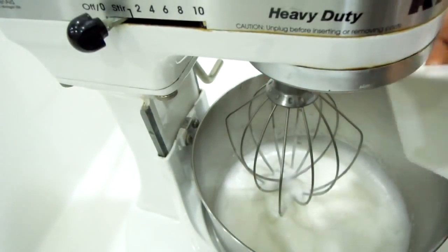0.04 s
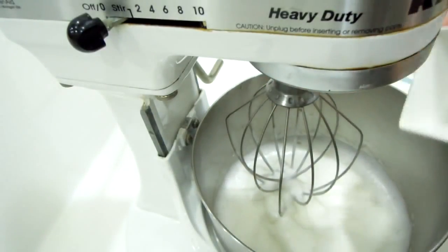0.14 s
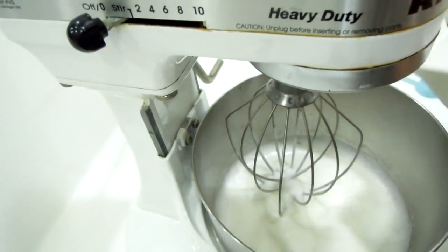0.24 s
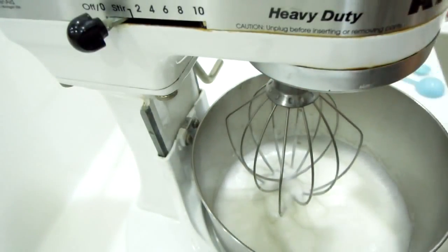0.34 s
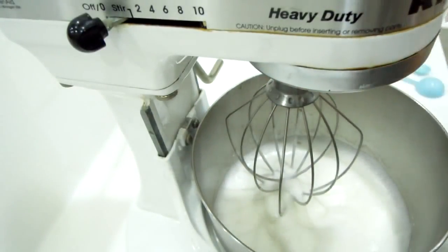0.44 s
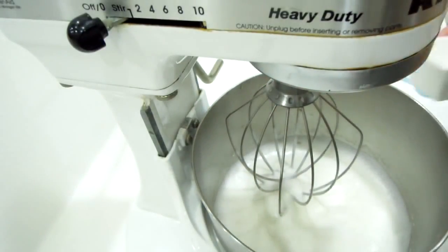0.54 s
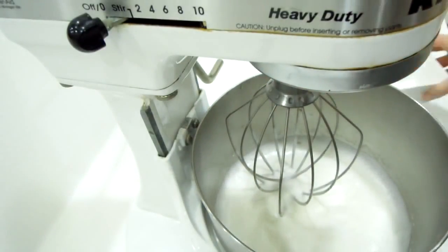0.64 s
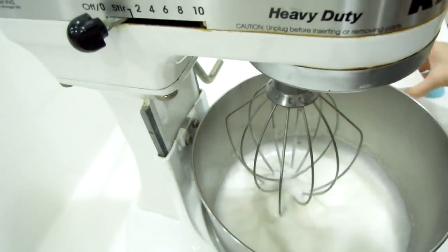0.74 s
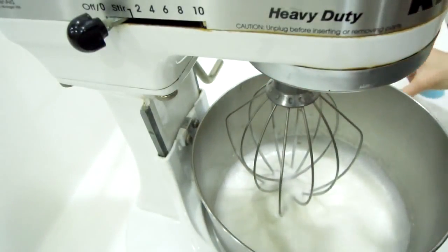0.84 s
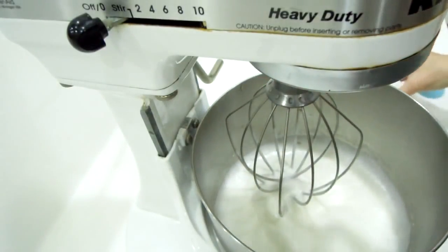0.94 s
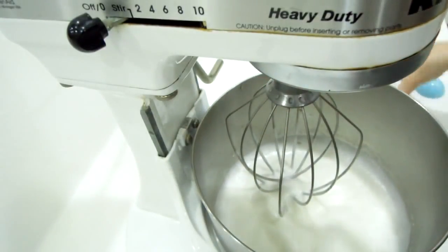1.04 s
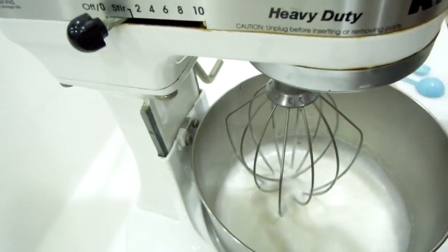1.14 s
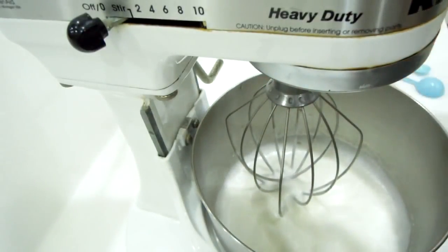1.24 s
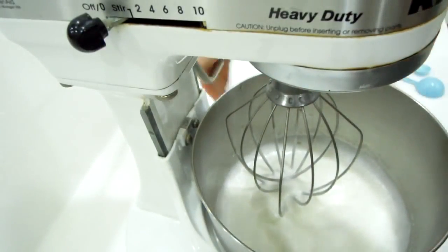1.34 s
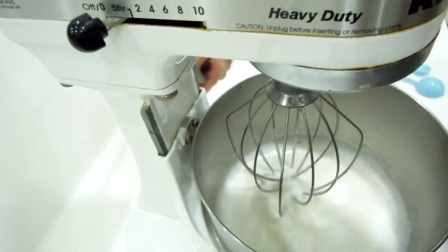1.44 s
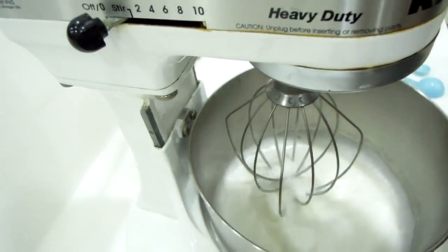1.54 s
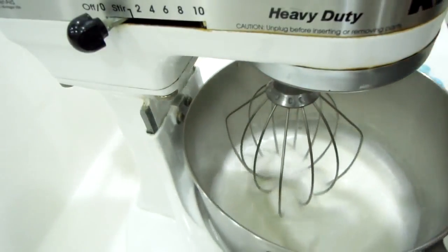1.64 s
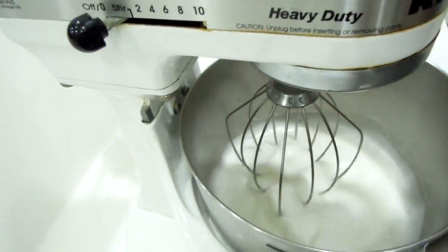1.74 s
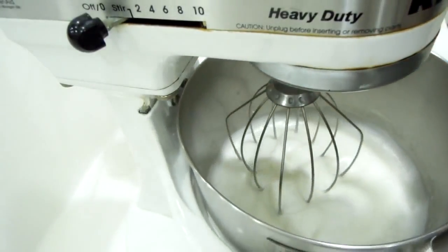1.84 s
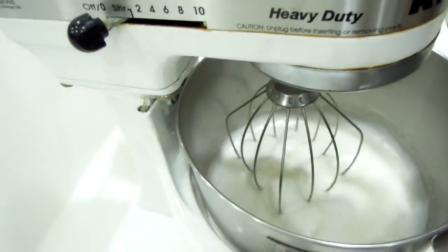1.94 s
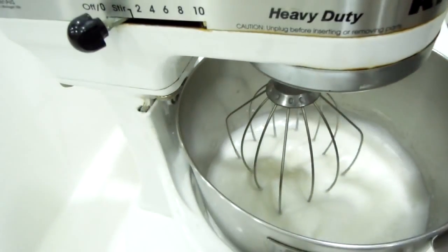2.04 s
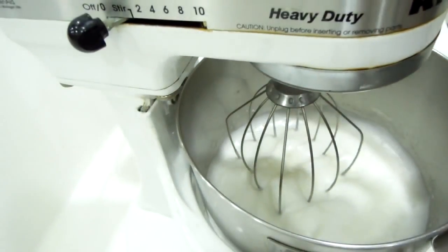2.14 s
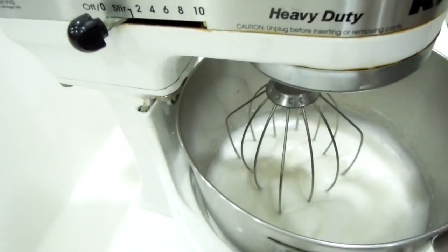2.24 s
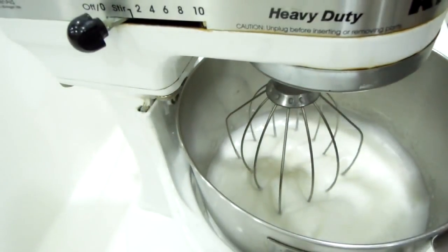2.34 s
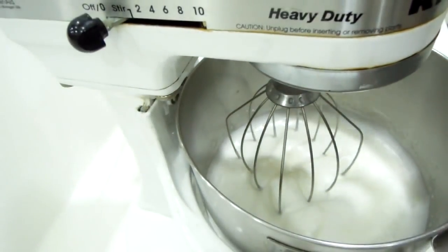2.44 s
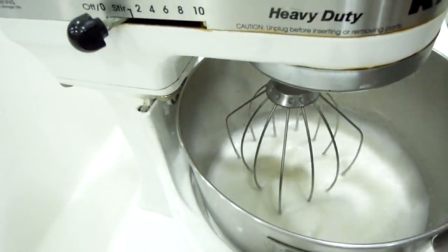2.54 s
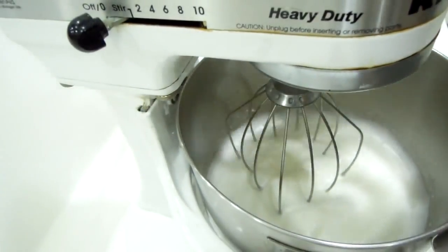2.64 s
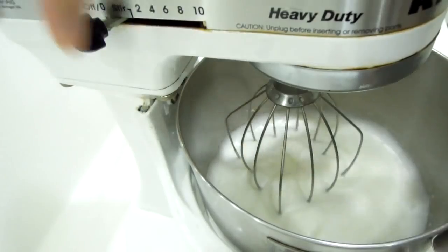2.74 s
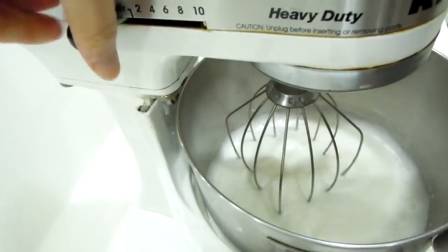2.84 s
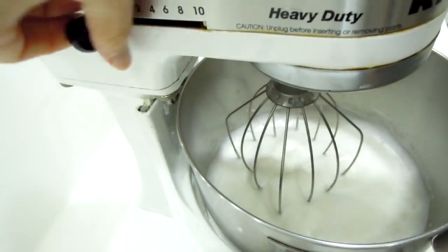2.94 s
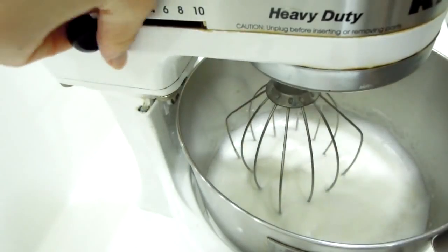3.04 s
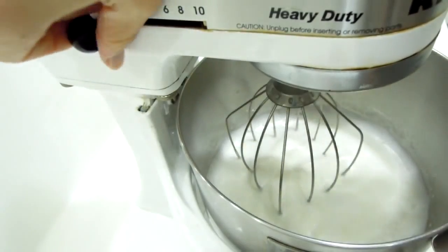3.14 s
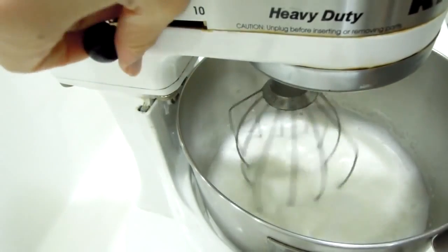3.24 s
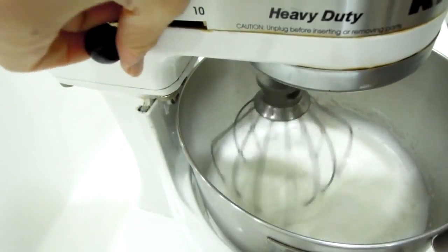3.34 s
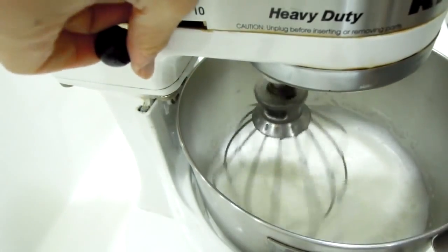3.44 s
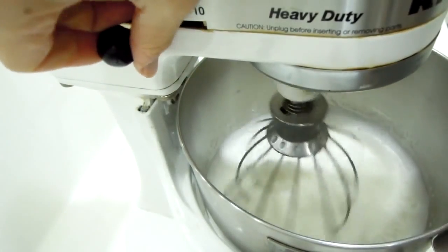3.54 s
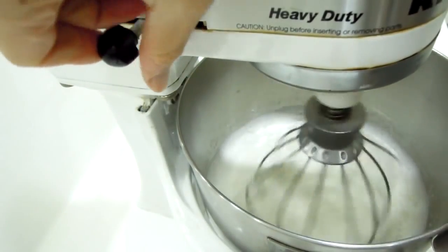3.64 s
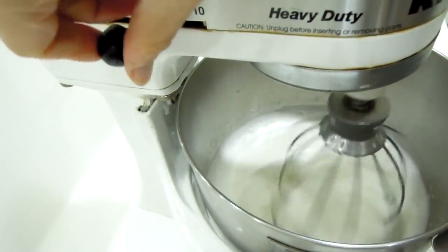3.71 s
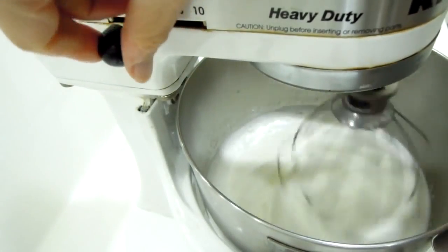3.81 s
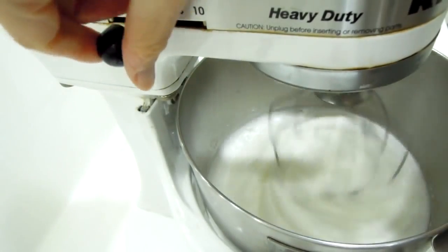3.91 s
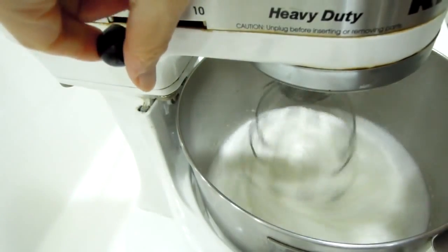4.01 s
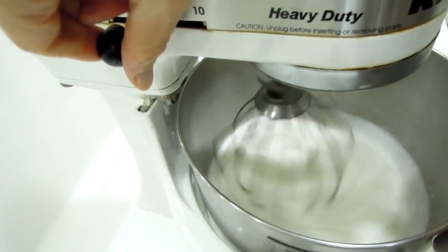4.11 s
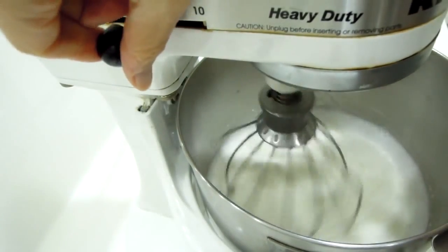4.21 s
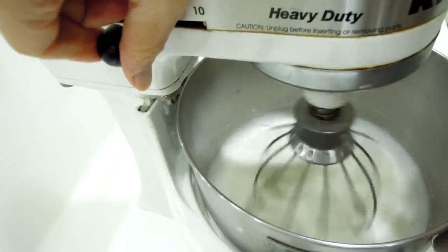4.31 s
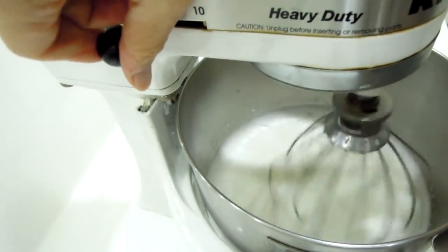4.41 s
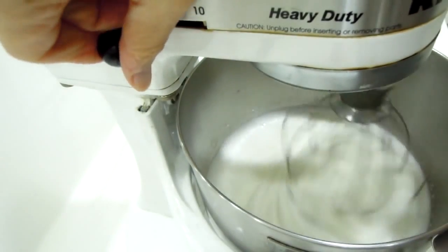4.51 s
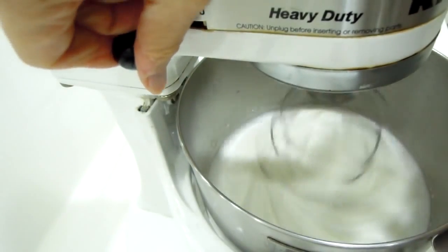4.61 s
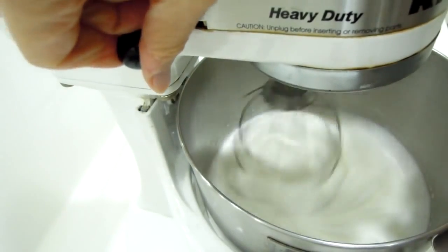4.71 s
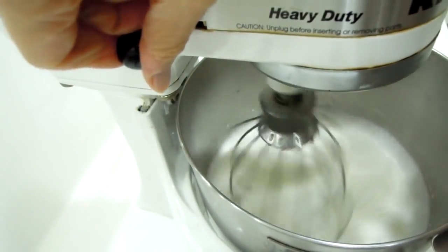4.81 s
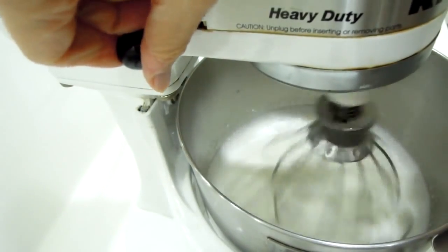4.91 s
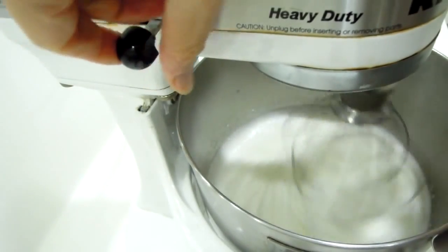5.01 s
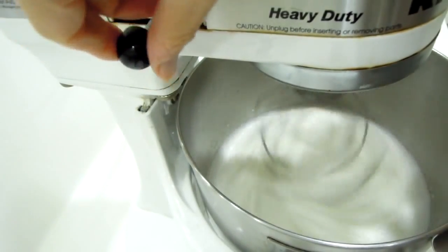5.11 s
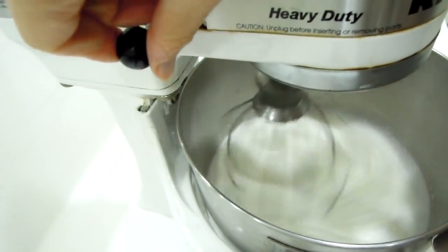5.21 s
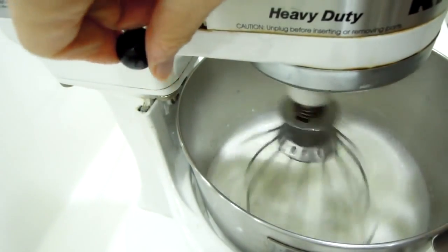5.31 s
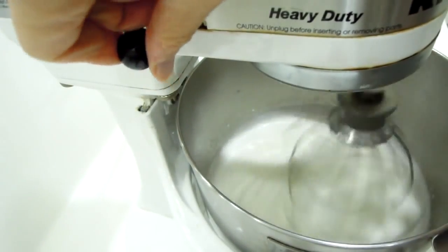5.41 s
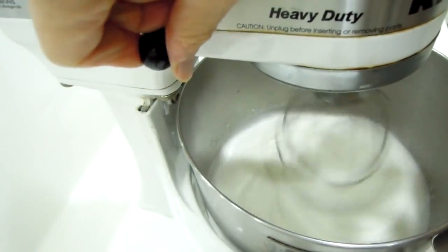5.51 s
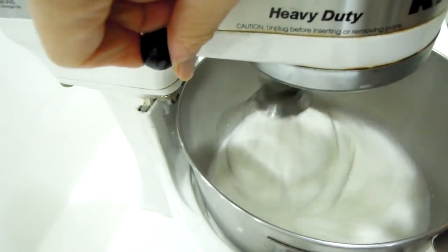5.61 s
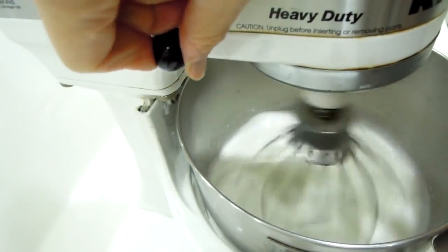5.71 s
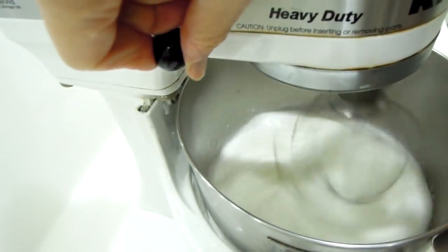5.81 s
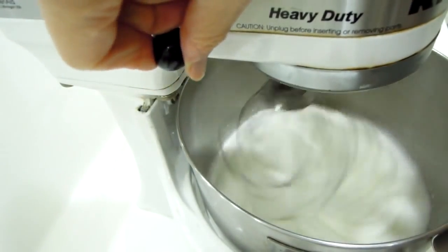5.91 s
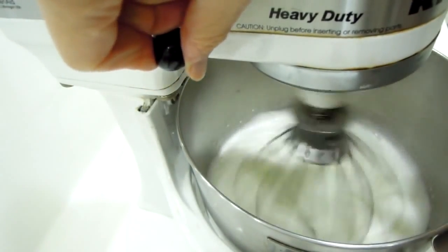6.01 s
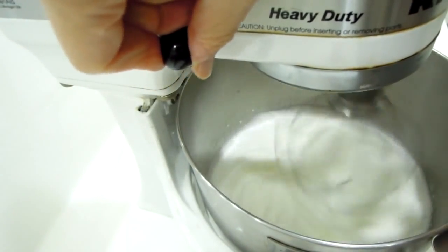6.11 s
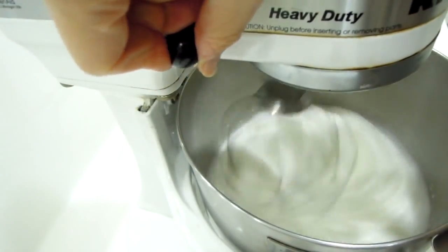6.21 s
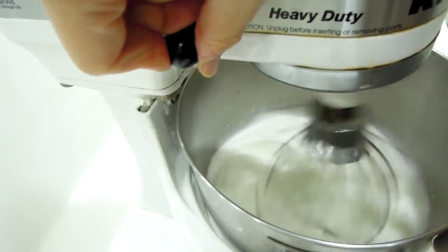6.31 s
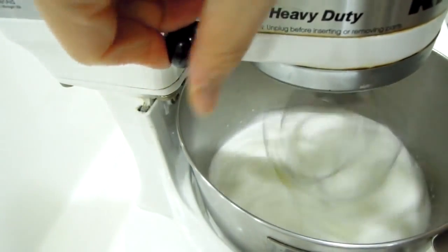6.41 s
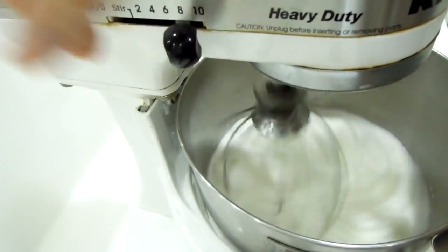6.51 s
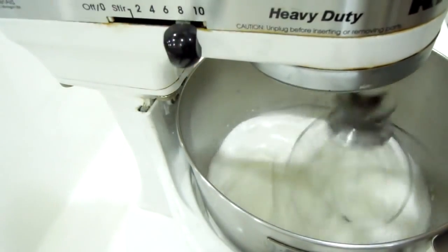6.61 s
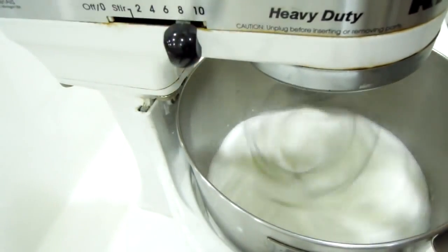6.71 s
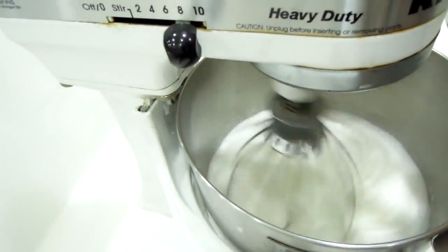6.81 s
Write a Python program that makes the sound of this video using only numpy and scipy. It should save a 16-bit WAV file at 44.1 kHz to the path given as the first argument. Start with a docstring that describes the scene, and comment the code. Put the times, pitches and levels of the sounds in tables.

```python
"""A quiet kitchen with a fridge humming (noise and sines) and faint bright ticks (puffs of noise).
At about 1 s a jug is set down on the counter: noise bursts knock, and fading sines ring until a hand stops them.
From 1.6 s a stand mixer's bowl is cranked up: gliding tones squeak, noise scrapes and clunks, a latch snaps.
At 3.05 s the speed lever clicks, and from 3.4 s the motor speeds up step by step to the end: noise roars,
and tones tied to the shaft speed whine over a steady mains buzz. Near sounds echo in the room."""
import sys
import numpy as np
from scipy import signal
from scipy.fft import rfft, irfft, next_fast_len
from scipy.io import wavfile
from scipy.ndimage import uniform_filter1d

SR = 44100
rng = np.random.default_rng(int(sys.argv[2]) if len(sys.argv) > 2 else 0)


def waveform_to_disk(signal):
    """Save audio, clipped to [-1, 1], as 16-bit WAV at the path in sys.argv[1]."""
    frames = np.transpose(np.atleast_2d(signal))
    scaled = np.clip(frames, -1, 1) * 32767
    samples = np.round(scaled).astype(np.int16)
    wavfile.write(sys.argv[1], SR, samples)


N = 302526
TIME = np.arange(N) / SR
EDGE_HZ = 14200  # top of the sound

# In all tables t60 is the time a sound takes to fade by 60 dB.
# colour of the quiet kitchen: (frequency [Hz], level [dB per Hz])
FLOOR = [(12, -41), (20, -6.5), (107, -5.5), (141, -21), (176, -4), (207, -4), (296, -14.5), (379, -9),
         (473, -13), (605, -12.5), (714, -14.5), (1170, -17.5), (14300, -28.5)]
FLOOR_DB = -46.5
# hum of a fridge nearby: (frequency [Hz], level [dB])
FRIDGE_HUM = [(177.6, -61), (296.1, -59.5), (414.5, -64), (473.7, -58.5), (710.6, -55.5), (829.0, -68)]
# how alike left and right are in the quiet kitchen: (frequency [Hz], likeness [0-1])
SAME_FLOOR = [(60, 0.71), (180, 0.89), (540, 0.69), (1630, 0.47), (4880, 0.19), (14700, 0.03)]
# how alike left and right are in the roar, scrapes and echo: (frequency [Hz], likeness [0-1])
SAME = [(60, 1), (150, 0.98), (380, 0.99), (940, 1), (2350, 0.96), (5870, 0.77), (14700, 0.073)]
# how far the sound leans to the left: (frequency [Hz], left over right [dB])
LEAN = [(60, -1.6), (180, -1.3), (540, -1.6), (1630, -0.81), (4880, 0.21), (14700, 1.0)]
# faint bright ticks: (time [s], level [dB], centre [Hz], lower edge [Hz], t60 [s])
TICKS = [(.204, -40, 7320, 3000, .09), (.4294, -41, 8970, 3000, .08), (.6265, -42, 5610, 3000, .06),
         (.6594, -40, 13000, 4000, 0.1), (.885, -36, 10400, 3000, 0.16), (2.718, -42, 11900, 5040, 0.13),
         (2.895, -36, 8200, 2500, 0.025), (2.918, -40, 8000, 3000, 0.23), (2.955, -40.5, 7500, 2000, 0.22),
         (3.1184, -30, 7000, 3500, .012), (3.172, -37.5, 7400, 4000, 0.19)]
# how long the room echoes: (frequency [Hz], t60 [s])
ROOM = [(150, 0.44), (500, 0.41), (2000, 0.5), (6000, 0.34), (14000, 0.34)]

# knocks, one table an object:
# (time [s], level [dB], tilt [dB/octave], t60 [s], low thump [dB], left over right [dB])
SET_DOWN = [(.9712, -23.5, 4.5, 0.062, -48, -.5), (1.0636, 5, -2, 0.14, -24, -2),
            (1.163, -10, -1.5, .12, -42, 4), (1.178, 3, 1, 0.18, -26, -2),
            (1.557, -28.5, 9.5, 0.11, -55, .2)]
CLUNKS = [(1.611, -31, -3, 0.098, -47, -1.), (1.638, -44, -3., .1, -41, -1.),
          (1.689, -32, -1, .1, -40, -.5), (1.726, -19.5, -5.5, 0.25, -38, -1.),
          (1.7895, 4.5, -2.5, .12, -10.5, -0.16), (1.9498, -1, -3.5, 0.12, -9.5, -.7),
          (2.0712, 2, 2, 0.076, -8.5, -0.27), (3.381, -17, 0, 0.15, -47, -.5)]
LATCH = [(2.427, -8, 0.0079, 0.14, -60, 1), (2.471, -10, 0.0, 0.21, -62, 0.0),
         (2.528, -28, 0.025, 0.2, -45, 0.0)]
LEVER = [(3.054, -27, 0., 0.046, -65, 0.), (3.068, -30, 1., 0.05, -65, 0.)]  # the speed lever's detent
# colour of each object's blows: a pair of lists,
# (frequency [Hz], level [dB per Hz]) and what rings in it (frequency [Hz], width [Hz], level [dB])
SET_DOWN_COLOUR = ([(60, -44), (150, -10.5), (300, -10.5), (450, 1), (800, -5.5), (1300, -2), (2000, -4),
                    (2800, -6.5), (3600, -14), (5000, -18.5), (8000, -29.5), (14300, -55)], [(566, 110, -1),
                    (1280, 37, -12), (1480, 61, -5), (1690, 63, -12), (2000, 98, 5), (2660, 34, -19),
                    (2960, 97, -11), (3230, 130, 3), (3660, 58, -16)])
CLUNK_COLOUR = ([(150, -25), (250, -12), (388, -5.5), (818, -10), (1150, -4.5), (1430, -9.5), (3330, -9),
                 (5450, -10), (6560, -11), (14300, -22.5)], [(1230, 79, -29), (2120, 75, 5.5),
                 (3350, 50, 4), (3700, 35, 5), (4600, 57, 8), (6170, 33, -26.5), (6900, 170, 3),
                 (6300, 82, -15), (7550, 150, 1), (8000, 95, 5)])
LATCH_COLOUR = ([(150, -60), (250, -39), (286, -38), (667, -49), (1170, 0), (1380, -26), (1640, 8),
                 (2080, -4), (7640, -5.5), (14300, -23)], [(1270, 50, 0), (1570, 27, -10), (2920, 69, 0),
                 (4240, 76, -3), (5190, 74, -1), (6600, 29, 0), (7160, 30, -7), (7570, 55, 4),
                 (9550, 64, -19), (11700, 46, -17)])
LEVER_COLOUR = ([(300, -30), (1200, -16), (2200, 3), (4000, -8), (9000, -8.5), (14300, -11)],
                 [(2300, 200, -18), (3850, 200, -4), (6300, 180, -2), (9000, 300, -8)])
# the stand rocking on the counter: (frequency [Hz], relative level [dB], t60 [s])
THUMP = [(150, 10, 0.13), (119, -6, 0.11), (76.6, -5.5, 0.28), (39, -1, 0.08)]

# tones of the jug: (frequency [Hz], relative level [dB], t60 [s])
JUG = [(5514, -6, 0.55), (5616, 6, 0.25), (5670, -0.5, 0.65), (6760, -22, .25), (6660, -5.5, 0.32),
       (11400, -29, 0.17), (12260, -20, 0.22), (12900, -9, .12), (13680, -28, .25)]
# blows that make the jug ring: (time [s], level [dB])
JUG_BLOWS = [(1.066, -38), (1.182, -18.5)]
JUG_STOPS = 1.4  # a hand has damped it by then, s

# squeaks of the lift slide: (start [s], rise [s], hold [s], first pitch [Hz], held pitch [Hz],
# level [dB], tail level [dB], tail t60 [s], flutter [dB], overtones [dB])
SQUEAKS = [(1.629, 0.011, 0.014, 8500, 8590, -13, -29, 0.21, 1.5, -60),
           (1.692, .01, 0.015, 5300, 5350, -38.5, -45, .06, 1.5, -60),
           (2.315, .07, .05, 1193, 1083, -31, -70, .02, -0.5, 3)]
SQUEAK_RISE_DB, SQUEAK_DROP_S = 35, 0.0049
# overtones of a squeak: (multiple of its pitch, relative level [dB])
SQUEAK_TOPS = [(2, -20), (3, -27), (4, -30), (5, -27), (7, -26), (10, -34)]
# strokes of the slide: (start [s], length [s], first level [dB], last level [dB], t60 [s])
SCRAPES = [(1.611, 0.037, -41.5, -31, .08), (1.686, 0.099, -29, -29, .02), (2.44, 0.087, -53, -39.5, 0.41)]
# colour of the rubbing slide: (frequency [Hz], level [dB per Hz])
SCRAPE = [(88, -24), (150, 1), (451, -9), (556, -4), (1140, 5.5), (1490, -16), (1800, -8), (8710, -31),
          (14000, -39)]

# the motor as the lever is pushed up: (time [s], shaft speed [Hz], roar level [dB])
MOTOR = [(3.38, 42.23, -15.5), (3.46, 43.57, -18), (3.63, 44.87, -17), (3.68, 52.06, -13), (3.8, 58.4, -14),
         (3.95, 67.8, -15.5), (4.02, 69.5, -14.5), (4.3, 69.97, -17.5), (4.72, 70.2, -16.5),
         (4.77, 74.4, -10), (4.805, 86.5, -9.5), (4.87, 95.3, -10), (4.97, 99.9, -15), (5.25, 104.1, -13.5),
         (5.615, 108.1, -14), (5.64, 114.3, -11.5), (5.68, 118.9, -11.5), (5.72, 127.3, -11.5),
         (5.78, 136.4, -7), (5.86, 141.7, -11), (6.03, 157.7, -9), (6.22, 159, -11.5), (6.41, 170.7, -9.5),
         (6.55, 177.2, -11), (6.65, 177.9, -11), (6.86, 176.4, -9.5)]
MIDDLE_HZ = 90  # shaft speed from which octaves are counted
# colour of the roar: (frequency [Hz], level [dB per Hz])
ROAR = [(18, -65), (30, -83), (118, -57), (152, -10), (262, -11), (474, -1), (614, -10), (663, -9.5),
        (816, -7), (1330, -5.5), (1600, -1.5), (2810, -5.5), (5360, -13), (6590, -13.5), (14300, -22.5)]
# resonances of the cast head: (frequency [Hz], width [Hz], relative level [dB])
HOUSING = [(484, 56, 2), (542, 36, 7), (800, 81, 8.5), (1174, 51, 5.5), (1610, 73, 1), (1830, 25, 3),
           (2092, 54, 6), (2350, 29, 2.5), (2580, 19, 2.5), (2810, 150, -1), (3166, 34, 4.5), (3800, 79, 3),
           (6480, 680, 0.5), (8100, 100, -18)]
# the roar brightens with speed: dB/octave at MIDDLE_HZ, and its growth for each doubling
TILT, TILT_PER_OCTAVE = 0.2, 2.4
THROB = 0.11  # strength of the torque pulses
# the unbalanced shaft shakes the stand: (shaft speed [Hz], level [dB])
SHAKE = [(42, -63), (70, -55), (92, -44.5), (108, -44.5), (130, -33), (145, -30), (151, -26), (166, -20),
         (173, -31), (178, -28.5)]
# the two strongest gear tones: (multiple of the shaft speed, relative level [dB])
PINION = [(9, 0), (10, -2)]
# how the head sounds them: (frequency [Hz], level [dB])
PINION_PATH = [(380, -50), (560, -38), (700, -31), (780, -26), (900, -45), (1000, -39), (1075, -15),
               (1140, -13), (1300, -28), (1420, -15.5), (1500, -21), (1580, -19.5), (1660, -23),
               (1740, -13), (1790, -40)]
# further gear tones: (multiple of the shaft speed, relative level [dB])
GEARS = [(2, -7.5), (3, -1), (7, 1.5), (8, 1.5), (12, 5.5), (13, 7), (14, 7.5), (15, -1), (16, 8.5),
         (18, 7), (20, 8), (26, -3)]
GEARS_DB, GEARS_DB_PER_OCTAVE = -39.5, 9.5
BARS = 22  # commutator bars a turn
# how the head sounds the bar tone: (frequency [Hz], level [dB])
BAR_PATH = [(920, -26.5), (1000, -29), (1135, -16.5), (1260, -40), (1430, -14), (1540, -21.5), (1650, -19),
            (1900, -31), (2100, -21.5), (2380, -28.5), (2500, -13), (2620, -10.5), (2800, -17), (3150, -15),
            (3260, -22), (3500, -23), (3900, -24)]
BAR_SURGE_DB = 1.5  # the bar tone swells while the rotor changes speed
SWING, SWING_DB_PER_OCTAVE = 1.08, -4.5  # its beating at the magnetic pull fades as the speed rises
# whine at the bar rate's multiples: (multiple of the bar rate, relative level [dB])
WHINE = [(2, -20.5), (3, -27.5), (4, -34), (5, -38.5), (6, -40), (7, -51)]
# how the whine changes with speed: (shaft speed [Hz], level [dB])
WHINE_LEVEL = [(42, 4), (62, 14), (68, 3), (105, 2), (150, -3), (160, -10), (178, -4)]
# how strongly each pitch of the whine comes out: (frequency [Hz], level [dB])
WHINE_PASS = [(2500, -27), (4500, -9.5), (6000, -7.5), (7500, -2.5), (9200, 6.5), (10500, 2.5), (12000, -1),
              (14000, -22)]
MAINS_HZ = 120.25  # twice the supply: magnetic pull on the frame
# mains buzz: (multiple of the pull rate, relative level [dB])
BUZZ = [(2.5, -38.5), (4, -26.5), (5, -25.5), (6, -69), (7, -24), (8, -27), (9, -31.5), (10, -32)]
# how the buzz changes with time: (time [s], level [dB])
BUZZ_LOAD = [(3.38, -14), (3.5, 3.5), (3.98, 3.5), (4.08, -9), (4.25, -6.5), (4.8, 1.5), (5.0, 0), (5.4, 1),
             (5.7, -3), (6.86, -16)]
# a low drone, heard only while the motor runs: (frequency [Hz], level [dB], start [s], end [s])
DRONE = (181, -39, 2, 6)
# the gears take up their slack as the motor starts: (time [s], level [dB])
SLACK = [(3.395, -14), (3.41, -14), (3.427, -14), (3.451, -25), (3.485, -17)]
# the rest of each slack knock: (tilt [dB/octave], t60 [s], low thump [dB], left over right [dB])
SLACK_BLOW = (-0.5, 0, -60, -.5)


def amp(db):
    """Turns a level in dB into a gain."""
    return np.exp(np.asarray(db) * (np.log(10) / 20))


def evened(x):
    """Scales a sound to an average (rms) strength of 1."""
    return x / np.sqrt(np.mean(x ** 2) + 1e-20)


def read(points, hz):
    """Reads a table at the frequencies hz, with even steps per octave."""
    f, value = np.transpose(points)
    return np.interp(np.log(hz + 1), np.log(f + 1), value)


def played(rows):
    """The columns of a timed table at every sample, and a gate that is open while it lasts."""
    s, *columns = np.transpose(rows)
    opening = np.clip((TIME - s[0]) / 0.0016, 0, 1)
    closing = np.clip((s[-1] + 0.013 - TIME) / 0.0092, 0, 1)
    return opening * closing, [np.interp(TIME, s, c) for c in columns]


def add(mix, s, sound):
    """Lays a sound into the mix at time s."""
    part = mix[..., round(s * SR):][..., :sound.shape[-1]]
    part += sound[..., :part.shape[-1]]


def drift(rate_hz):
    """A random curve of rms 1 that wanders faster for a higher rate."""
    return evened(signal.lfilter([1], [1, -np.exp(-2 * np.pi * rate_hz / SR)], rng.standard_normal(N)))


def noise(shape_db, same, size):
    """Two-channel noise built from short random spectra; shape_db(Hz, s) gives its colour."""
    hop = size // 4
    frames = N // hop + 5
    hz = np.fft.rfftfreq(size, 1 / SR)[:, None]
    a, b, c, d = rng.standard_normal((frames, len(hz), 4)).T
    like = np.clip(read(same, hz), -1, 1)
    left = a + 1j * b
    right = like * left + np.sqrt(1 - like ** 2) * (c + 1j * d)
    gain = amp(shape_db(hz, np.arange(frames) * hop / SR)) * np.ones(frames)
    spectra = np.array([left, right]) * (gain / np.sqrt((gain ** 2).mean(0)))
    return evened(signal.istft(spectra, nperseg=size, noverlap=size - hop)[1][:, :N])


def rings(modes, seconds):
    """Sum of the fading sines of a struck object."""
    t = np.arange(round(seconds * SR)) / SR
    return sum(amp(db - 60 * t / max(t60, 0.01)) * np.sin(2 * np.pi * hz * t) for hz, db, t60 in modes)


def resonance_boost_db(peaks, hz, strength_db):
    """Boost in dB that a set of resonances gives at hz."""
    top = max(db for _, _, db in peaks)
    power = sum(amp(2 * (db - top + strength_db)) / (1 + (2 * (hz - f) / width) ** 2)
                for f, width, db in peaks)
    return 10 * np.log10(1 + power)


def kitchen():
    """Room air and microphone hiss as noise, with the wavering sines of a fridge's hum."""
    hum = np.zeros(N)
    for hz, db in FRIDGE_HUM:
        hum += np.sqrt(2) * amp(db + 2.9 * drift(2.1)) * np.sin(2 * np.pi * hz * TIME + 0.5 * drift(1))
    air = noise(lambda hz, s: read(FLOOR, hz), SAME_FLOOR, size=2048)
    return amp(FLOOR_DB + 0.27 * drift(9)) * air + hum


def ticks():
    """Short fading puffs of treble noise, strongest round a centre pitch."""
    out = np.zeros((2, N))
    t = np.arange(round(0.08 * SR)) / SR
    hz = np.fft.rfftfreq(len(t), 1 / SR)
    bursts = rng.standard_normal((len(TICKS), 2, len(t)))
    for (s, db, centre_hz, edge_hz, t60), burst in zip(TICKS, bursts):
        treble = hz ** 2 / (hz ** 2 + edge_hz ** 2)
        colour = treble * (0.5 + 1 / (1 + ((hz - centre_hz) / 600) ** 2))
        shared = burst[0] + 0.65 * burst  # makes the channels partly alike
        puff = evened(irfft(rfft(shared) * colour, len(t))) * amp(-60 * t / max(t60, 0.005))
        add(out, s, 0.48 * amp(db) * puff)
    return out


def room(x):
    """Echo from sparse taps of random sign, each band dying at its own speed; the bass is alike in both ears."""
    taps, spacing = np.zeros((2, SR // 2)), 20
    at = np.arange(100, SR // 2 - spacing, spacing)
    at = at + rng.integers(0, spacing, (2, len(at)))
    np.put_along_axis(taps, at, rng.choice([-1., 1.], at.shape), 1)
    hz, t, spectra = signal.stft(taps, SR, nperseg=256)
    like = np.clip(read(SAME, hz), -1, 1)[:, None]
    spectra[1] = like * spectra[0] + np.sqrt(1 - like ** 2) * spectra[1]
    fade = amp(-60 * t / read(ROOM, hz)[:, None])
    tail = signal.istft(spectra * fade, SR, nperseg=256)[1]
    return signal.fftconvolve(x.mean(0)[None], tail / np.linalg.norm(tail[0]), axes=1)[:, :N]


def knocks(rows, colour, ring_db):
    """Each knock: a sharp crack, a clatter of noise through the object's resonances, and a low thump."""
    out = np.zeros((2, N))
    t = np.arange(round(0.4 * SR)) / SR
    hz = np.fft.rfftfreq(len(t), 1 / SR)
    thump = rings(THUMP, 0.4) * np.clip(t / 0.0064, 0, 1)
    thump = thump / abs(thump).max()
    wide_db = read(colour[0], hz)
    boost_db = resonance_boost_db(colour[1], hz, ring_db)
    bursts = rng.standard_normal((len(rows), 2, len(t)))
    for (s, db, tilt, t60, thump_db, pan_db), burst in zip(rows, bursts):
        tilted_db = wide_db + tilt * np.log2(hz / 1500 + 0.24)
        crack = evened(irfft(rfft(burst[0]) * amp(1.14 * tilted_db), len(t))) * amp(-60 * t / 0.043)
        clatter = evened(irfft(rfft(burst[1]) * amp(tilted_db + boost_db), len(t)))
        blow = crack + 0.98 * clatter * amp(-60 * t / max(t60, 0.02))
        sound = 0.43 * amp(db) * blow + amp(thump_db) * thump
        add(out, s, sound * amp([[pan_db / 2], [-pan_db / 2]]))
    return out


def jug():
    """The jug rings in fading sines after both blows, until it is held."""
    out = np.zeros(N)
    for s, db in JUG_BLOWS:
        add(out, s, amp(db) * rings(JUG, 0.5))
    return out * np.clip((JUG_STOPS - TIME) / 0.013, 0, 1)


def scrapes():
    """The slide rubs: uneven noise whose level glides along each stroke and then dies away."""
    out = np.zeros((2, N))
    rub = noise(lambda hz, s: read(SCRAPE, hz), SAME, size=256) * amp(2.3 * drift(80))
    for s, length, first_db, last_db, t60 in SCRAPES:
        t = TIME - s
        level_db = np.interp(t, [0, length], [first_db, last_db])
        level_db -= 60 * np.maximum(t - length, 0) / t60
        out += np.clip(t / 0.004, 0, 1) * amp(level_db) * rub
    return out


def squeaks():
    """The slide sticks and slips: tones rise, hold and drop to a dying tail."""
    out = np.zeros(N)
    for s, rise, hold, first_hz, held_hz, db, tail_db, t60, flutter_db, tops_db in SQUEAKS:
        t, end = TIME - s, rise + hold + SQUEAK_DROP_S
        level_db = np.interp(t, [0, rise, rise + hold, end], [db - SQUEAK_RISE_DB, db, db, tail_db])
        level_db -= 60 * np.maximum(t - end, 0) / t60
        pitch = np.interp(t, [0, rise], [first_hz, held_hz])
        phase = 2 * np.pi * np.cumsum(pitch) / SR + 0.019 * flutter_db * drift(36)
        tone = np.sin(phase)
        for k, top_db in SQUEAK_TOPS:
            if k * held_hz < EDGE_HZ:
                tone += amp(tops_db + top_db) * np.sin(round(k) * phase)
        out += (t > 0) * np.sqrt(2) * amp(level_db + flutter_db * drift(27)) * tone
    return out


def patches(hz, s, depth_db):
    """Random swells some hundred Hz wide and some tens of ms long."""
    field = rng.standard_normal((len(s), len(hz))).T
    smooth = uniform_filter1d(uniform_filter1d(field, size=7, axis=0), size=9, axis=1)
    return depth_db * evened(smooth)


def roar_shape(speed, tilt, surge):
    """Colour of the roar over time: body, resonances, and humps at the bar rate while the speed changes."""
    def shape_db(hz, s):
        bar_hz = BARS * np.interp(s, TIME, speed)
        humps = sum(size / (1 + ((hz - k * bar_hz) / (k * 85.0)) ** 2) for k, size in ((1, 4.), (2, 3.)))
        body_db = read(ROAR, hz) + resonance_boost_db(HOUSING, hz, 10.5)
        body_db = body_db + np.interp(s, TIME, tilt) * np.log2(hz / 1500 + 0.51)
        hump_db = 10 * np.log10(1 + humps * np.interp(s, TIME, surge))
        return body_db + hump_db + patches(hz, s, depth_db=1.57)
    return shape_db


def motor_roar(speed, roar_db, octaves, surge, turn, pull):
    """Gear and fan roar: noise that throbs with the supply and the shaft."""
    roar = noise(roar_shape(speed, TILT + TILT_PER_OCTAVE * octaves, surge), SAME, size=1024)
    kick = np.exp(THROB * np.cos(pull) + 0.04 * np.cos(turn))  # torque comes in pulses
    chatter = amp(1.13 * drift(37) + 0.26 * drift(9.3))  # gear teeth rattle unevenly
    return amp(roar_db) * roar * evened(kick * chatter)


def shaft_shake(speed, turn):
    """The unbalanced shaft shakes the stand once a turn."""
    return np.sqrt(2) * amp(read(SHAKE, speed) + 3.0 * drift(3.2)) * np.sin(turn + 0.13 * drift(45))


def gear_tones(speed, octaves, turn, shudder, wavers):
    """Tones at multiples of the shaft speed, which flare as they cross the head's resonances."""
    out = np.zeros(N)
    for k, db in PINION:
        size = amp(db + read(PINION_PATH, round(k) * speed) + 2.9 * drift(2.6))
        out += np.sqrt(2) * size * np.sin(round(k) * turn + shudder * drift(41))
    grid = np.arange(0, 5000, 5)
    head_db = resonance_boost_db(HOUSING, grid, 9.4)
    base_db = GEARS_DB + GEARS_DB_PER_OCTAVE * octaves
    for k, db in GEARS:
        waver = np.roll(wavers, round(k) * SR // 3, axis=1)  # shifted so that tones waver apart
        flare_db = 0.7 * np.interp(k * speed, grid, head_db)
        size = amp(base_db + db + flare_db + 3.98 * waver[0])
        out += size * np.sin(round(k) * turn + 0.5 * waver[2])
    return out


def bar_tone(speed, octaves, surge, turn, pull, shudder):
    """The tone of the commutator bars passing by, beating with the magnetic pull."""
    bar_db = read(BAR_PATH, BARS * speed) + BAR_SURGE_DB * np.tanh(surge)
    swing = 1 + SWING * amp(SWING_DB_PER_OCTAVE * octaves) * np.cos(pull)
    return amp(bar_db + 2.8 * drift(13.0)) * swing * np.sin(BARS * turn + shudder * drift(45))


def mains_buzz(pull, wavers):
    """The magnetic pull makes the frame buzz at whole and half multiples of its rate."""
    out = np.zeros(N)
    load_db = np.interp(TIME, *np.transpose(BUZZ_LOAD))
    for k, db in BUZZ:
        waver = np.roll(wavers, round(2 * k) * SR // 7, axis=1)
        out += amp(db + load_db + 2.0 * waver[1]) * np.sin(round(2 * k) / 2 * pull + 0.13 * waver[0])
    return out


def drone(wavers):
    """One low, steady tone that wavers a little."""
    hz, db, start, end = DRONE
    held = np.clip(np.minimum(TIME - start, end - TIME) / 0.098, 0, 1)
    return held * amp(db + 3 * wavers[0]) * np.sin(2 * np.pi * hz * TIME + 0.23 * wavers[1])


def commutator_whine(speed, surge, turn, wavers):
    """High tones at multiples of the bar rate; they climb with the shaft speed."""
    out = np.zeros((2, N))
    for k, db in WHINE:
        hz = round(k) * BARS * speed
        waver = np.roll(wavers, round(k) * SR, axis=1)
        surge_db = (6.2 * (k < 2.5) - 4.5) * np.tanh(surge)  # only the lowest tone gains in a surge
        level_db = read(WHINE_LEVEL, speed) + surge_db + db + read(WHINE_PASS, hz) + 2.8 * waver[1]
        size = amp(level_db) * (hz < EDGE_HZ)
        # the commutator runs a little off centre
        wobble = 0.1 * np.sin(turn) + (0.5 + 0.28 * surge) * waver[2]
        out += size * np.sin(round(k) * BARS * turn + wobble + [[0], [0.9]])  # right is shifted in phase
    return out


def motor():
    """Roar, shaft and gear tones, and whine follow one speed curve; buzz and drone keep their pitch."""
    gate, (speed, roar_db) = played(MOTOR)
    octaves = np.log2(speed / MIDDLE_HZ)
    turn = 2 * np.pi * np.cumsum(speed) / SR  # angle of the shaft
    pull = 2 * np.pi * MAINS_HZ * TIME
    surge = uniform_filter1d(abs(np.gradient(speed)) * SR / speed, size=2000)  # speed change, share a second
    shudder = 0.087 + 0.56 * surge  # the rotor shudders more while its speed changes
    wavers = np.array([drift(5.9), drift(6.6), drift(39)])
    tones = shaft_shake(speed, turn) + gear_tones(speed, octaves, turn, shudder, wavers)
    tones += bar_tone(speed, octaves, surge, turn, pull, shudder)
    tones += mains_buzz(pull, wavers) + drone(wavers)
    # the small head sounds no deep bass
    tones = signal.sosfilt(signal.butter(2, 70, "high", fs=SR, output="sos"), tones)
    roar = motor_roar(speed, roar_db, octaves, surge, turn, pull)
    return gate * (roar + tones + commutator_whine(speed, surge, turn, wavers))


def scene():
    """The quiet kitchen, everything near the mixer with its echo, and the motor."""
    near = ticks() + knocks(SET_DOWN, SET_DOWN_COLOUR, 6.2) + jug()
    near = near + knocks(CLUNKS, CLUNK_COLOUR, 12.4) + scrapes() + squeaks()
    near = near + knocks(LATCH, LATCH_COLOUR, 13.6) + knocks(LEVER, LEVER_COLOUR, 28.0)
    near = near + knocks([row + SLACK_BLOW for row in SLACK], CLUNK_COLOUR, 9.0)
    return kitchen() + near + amp(-6.5) * room(near) + motor()


def record(dry):
    """Gain control that ducks after loud sounds, a left-right lean, soft overload, then the treble limit."""
    power = uniform_filter1d((dry ** 2).mean(0), size=400, origin=150)
    power_db = 10 * np.log10(abs(power) + 1e-12)
    fall = 25.0 * TIME  # the held level falls 25 dB a second
    held_db = np.maximum.accumulate(power_db + fall) - fall
    over_db = np.maximum(held_db + 28.5, 0)
    ducked = dry / amp(0.29 * uniform_filter1d(over_db, size=300))
    size = next_fast_len(N)
    lean = read(LEAN, np.fft.rfftfreq(size, 1 / SR)) / 2
    leaned = irfft(rfft(ducked, size) * amp([lean, -lean]), size)[:, :N]
    rounded = leaned / (1 + abs(leaned) ** 6) ** (1 / 6)  # peaks round off near full scale
    band_limit = signal.firwin(511, EDGE_HZ, window=("kaiser", 9), fs=SR)
    return signal.oaconvolve(rounded, band_limit[None], "same")


dry = scene()
out = record(dry)
waveform_to_disk(out)
```